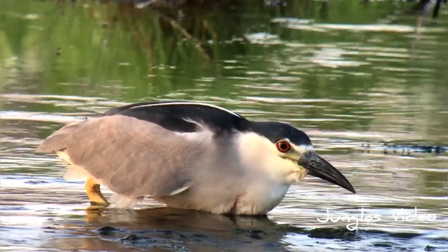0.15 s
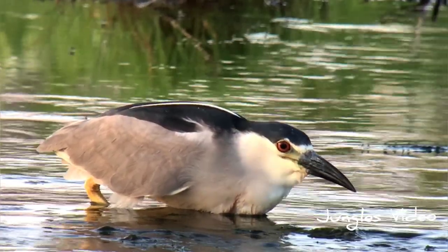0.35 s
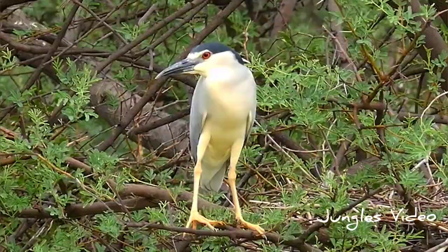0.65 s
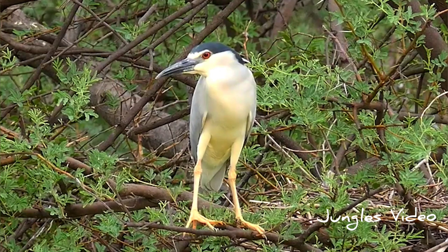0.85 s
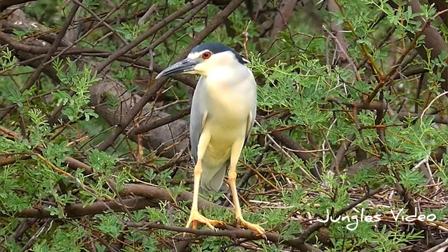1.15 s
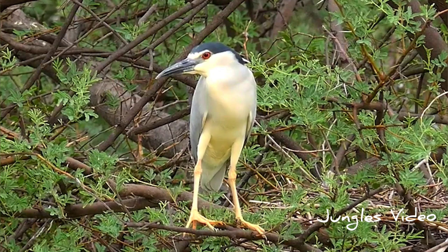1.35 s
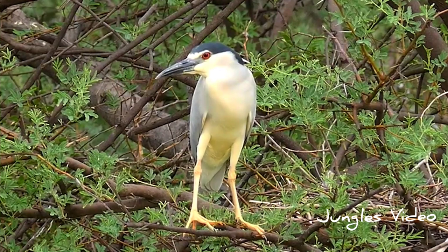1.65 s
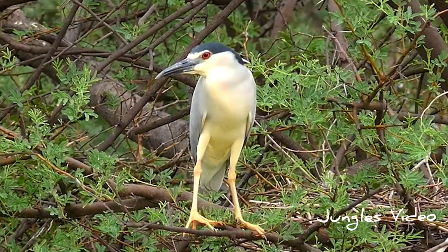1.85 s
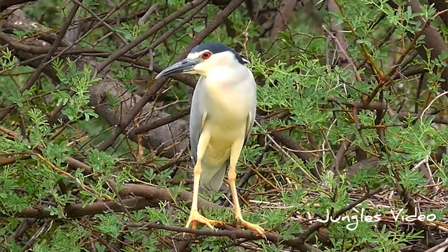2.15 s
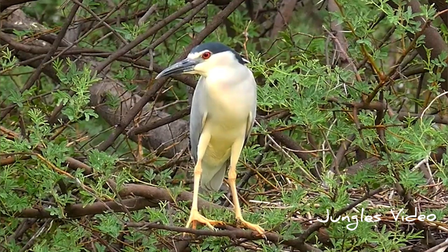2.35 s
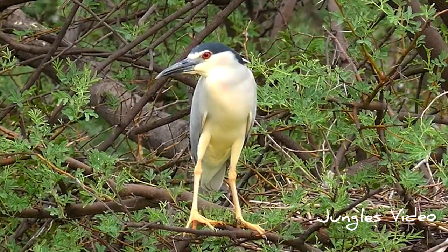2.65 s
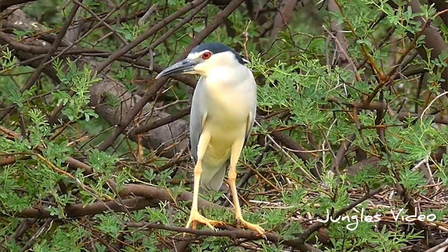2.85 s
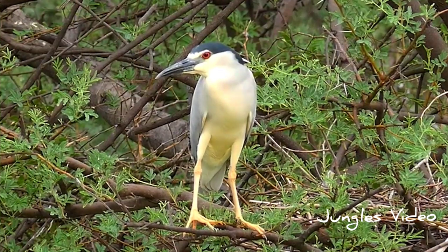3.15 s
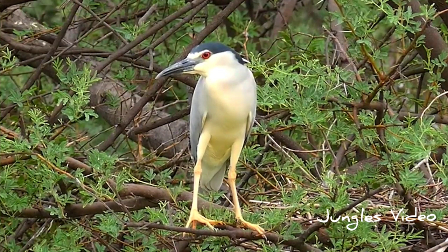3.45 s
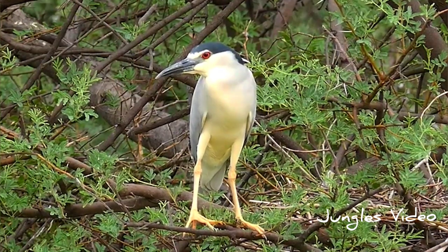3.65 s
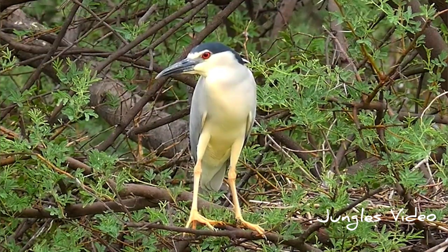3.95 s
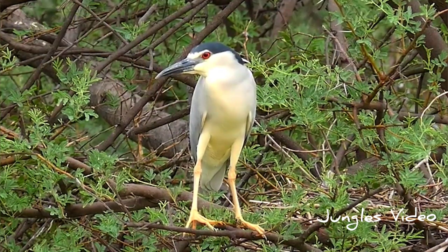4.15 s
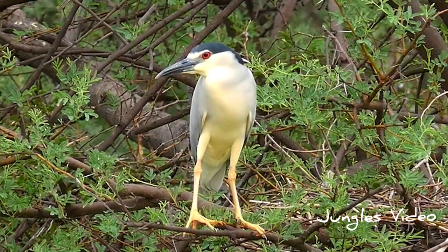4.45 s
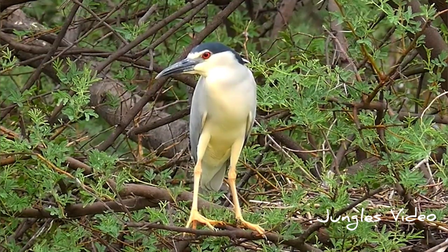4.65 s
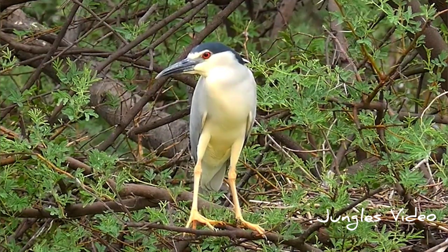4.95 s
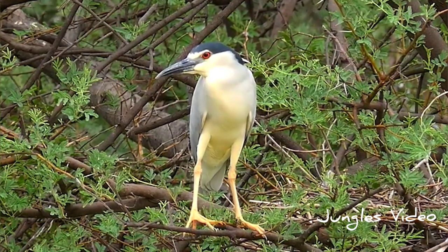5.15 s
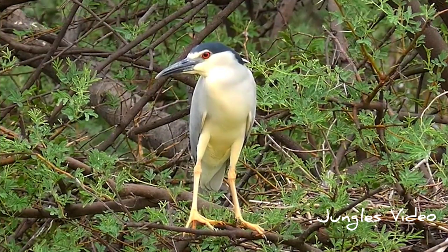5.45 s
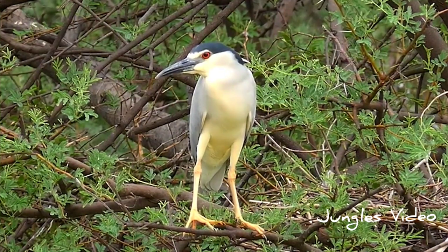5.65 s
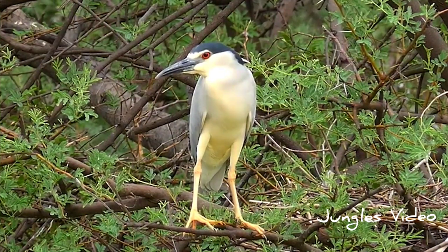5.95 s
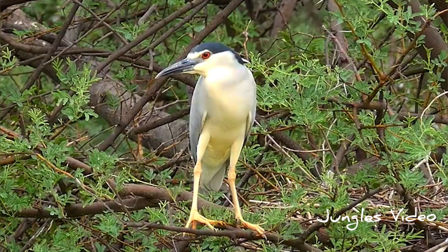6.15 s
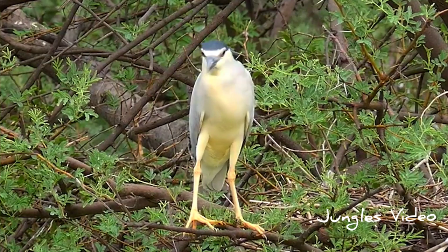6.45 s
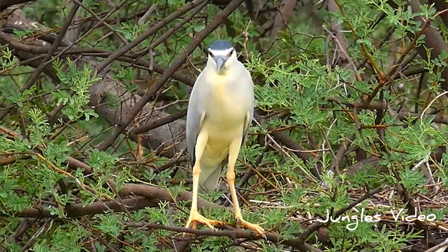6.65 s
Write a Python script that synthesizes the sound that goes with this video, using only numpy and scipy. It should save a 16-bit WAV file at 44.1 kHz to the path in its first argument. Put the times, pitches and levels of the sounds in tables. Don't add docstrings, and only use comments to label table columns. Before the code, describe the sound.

For the first 0.5 seconds there is only barely audible pond noise, then a short silent gap. From about 0.7 to 1.1 seconds a low far-traffic rumble and soft hiss fade in. At 1.1-1.3 a night heron gives one short, harsh, nasal squawk, with an echo from trees and bank. Thin descending whistles follow until 1.7, with rapid chips near 1.6. A distant engine hums upward in pitch until about 4.4, then coasts lower. Faint small-bird chips come near 2.1, 3.0, 3.8 and 4.6; a far heron answers breathily at 2.8 and more faintly at 4.3. Dry ticks and small knocks appear at 3.1-3.6. At 5.1 a second squawk, very brief, brighter and rougher, cracks out and echoes. A sharp tick follows at 5.4, a last chip at 6.2, and small ticks around 6.5 over continuing rumble.

```python
import sys
import numpy as np
from scipy import signal
from scipy.fft import rfft, irfft, next_fast_len
from scipy.io import wavfile
from scipy.ndimage import uniform_filter1d

SR = 44100
rng = np.random.default_rng(int(sys.argv[2]) if len(sys.argv) > 2 else 0)


def store_wav(level_fs):
    pcm = np.round(np.clip(np.atleast_2d(level_fs), -1, 1) * 32767)
    wavfile.write(sys.argv[1], SR, pcm.T.astype(np.int16))


def how_loud(loudness_db):
    steps = np.asarray(loudness_db, float) / 20
    return 10 ** steps


N = 300035

POND_DB, RUMBLE_DB, HISS_DB = -65.5, -43, -54.5
CUT_S, FADE_FROM_S, FADE_TO_S = 0.501, 0.66, 1.07
SETTLE_DB, SETTLE_S = -0.5, 0.46
LIFT_S, LIFT_LOSS_DB = 4.25, 6.5
STRAIN_HZ, STRAIN_RANGE_HZ = 418.8, 30
WHISTLE_SWELL_DB = 4
CHAT_FROM_HZ = 6200
LEAD_S, LEAD_LENGTH_S, LEAD_TO_HZ, LEAD_DB = 0.019, 0.012, 4820, -2.5
FAR_RISE_S, FAR_RISE_HZ, FAR_FADE_DB = 0.1, 110, 9

# freq_hz, level_db_per_hz
POND_SPECTRUM = [(15, -43), (25, -19), (75, 4), (141, -9.5), (534, -21.5), (855, -13.5), (1030, -20.5),
                 (1730, -26.5), (4940, -32.5), (12000, -28.5), (13000, -44)]
# freq_hz, level_db_per_hz
RUMBLE_SPECTRUM = [(15, -39), (25, -44), (47, -5), (70, -1), (109, -8), (237, -17), (315, -20.5),
                   (502, -33), (900, -40), (1170, -111), (1980, -120)]
# freq_hz, level_db_per_hz
HISS_SPECTRUM = [(350, -3.5), (600, -3.5), (1030, -1.5), (1180, -5), (1380, -2.5), (1530, -3.5),
                 (4680, -7.5), (8630, -10.5), (15500, -4.5)]
# centre_s, spread_s, gain_db
VEHICLE_SWELLS = [
    (1.949, 0.49, 2),
    (2.95, 0.54, 2),
    (4.05, 0.14, 1),
    (5.41, 0.14, 2),
]
# time_s, firing_hz, load_db
ENGINE_RUN = [(1.2, 27.4, 0), (1.8, 34, 1), (2.28, 40.5, -2), (3.14, 51.5, 1), (3.57, 56.97, 0),
              (4.1, 63.3, 0), (4.45, 66, -1), (4.65, 63, -9), (4.9, 62.5, -2), (5.2, 61, 1),
              (5.4, 60.7, -6), (5.6, 59.5, -1), (6.0, 55, -6)]
# best_firing_hz, level_db, loss_db_at_one_octave
ENGINE_ORDERS = [
    (60, -40.5, 80),
    (44, -41, 25),
    (52, -48, 80),
]
# start_s, length_s, pitch_hz, level_db
IDLING_ENGINES = [
    (.8, .85, 85.5, -45),
    (6.25, .5, 82, -46),
]
# time_s, pitch_hz, level_db, beak_opening_0_1, upper_line_push_db
SQUAWK_CURVES = [
    [(1.10, 345, -68, 0, -18), (1.135, 388.3, -43, 0.55, -18), (1.165, 400.6, -26, 0.79, -15),
     (1.18, 433.6, -26, .98, -.5), (1.2, 439, -28, 0.95, -1), (1.215, 411, -22, 0.91, -1),
     (1.238, 406.2, -18.5, 0.86, -8.5), (1.27, 349, -31, 0.66, 5), (1.3, 323, -56, 0.35, 9)],
    [(5.05, 307, -62, .2, -3), (5.075, 330.5, -47.5, 0, -7), (5.088, 339, -38.5, 0.08, -3),
     (5.10, 407, -34, 0.52, -3), (5.12, 416.7, -27.5, 0.75, -8), (5.14, 434, -17, 0.99, -4.5),
     (5.157, 425.2, -18.5, 1.01, 1), (5.176, 360.7, -27, 0.86, 0), (5.2, 322, -52, 0.06, -13)],
]
# freq_hz, width_hz, level_db, shut_lowering_hz, shut_change_db
WINDPIPES = [
    [(883, 130, -24, 40, -8), (1659, 160, 2.5, 770, 6), (3260, 390, -17, 200, -15),
     (3930, 300, -30.5, 50, 27), (5720, 560, -18.5, 200, 10), (6250, 260, -29, 50, 7),
     (6800, 500, -29, 100, -9), (8270, 640, -14, 100, -45), (11300, 1200, -36, 100, -19)],
    [(880, 130, -27.5, 20, -12), (1662, 280, 3, 650, -3), (2730, 520, -23, 100, -20),
     (4400, 660, -14.5, 670, 14), (5980, 500, -3.5, 50, -4), (7100, 370, -14, 50, -5),
     (7850, 260, -3.5, 50, -20), (8430, 490, -16.5, 50, -14), (9900, 340, -32, 50, -16),
     (12900, 1700, -40, 50, -12)],
]
MEMBRANES = [
    (.75, .2, .3, .3),
    (.45, .26, 1.01, .15),
]
# null_s, beats_per_s, depth_0_1
MEMBRANE_BEATS = [
    (1.172, 17, 0.02),
    (5.153, 82, 0.95),
]
# highs_db, neck_hz, neck_db
SIDE_SOUND = [
    (-22.5, 1585, -10.5),
    (-10, 1560, -4),
]
# time_s, length_s, gain_db
MEMBRANE_SLAPS = [
    (1.212, .004, 3),
    (5.139, .003, 5),
    (5.148, .002, 7),
    (5.154, .002, 6.5),
    (5.165, .003, 3),
    (5.172, .003, 3),
]
# freq_hz, pole_width_hz, zero_width_hz
GULLET_BRANCH = (2050, 740, 45)
# freq_hz, t60_s, near_trees_end_s
TREE_DECAY = [(1050, 0.63, 3), (1550, 1.21, 4.5), (2300, 0.63, .4), (3600, .6, .25), (4500, 1.9, 0.26),
              (6200, 1.9, 0.25), (8300, .7, .2), (10700, 0.33, 0.1)]
# delay_s, spread_s, gain_db
TREE_RETURNS = [
    (.09, 0.059, 1.5),
    (.2, 0.03, 3),
    (.35, 0.025, 1.5),
    (0.431, .03, -3),
    (.51, 0.026, 4.5),
]
# start_s, length_s, from_hz, to_hz, final_db
WHISTLE_NOTES = [
    (1.285, .095, 2060, 2010, -52),
    (1.39, .06, 1960, 1950, -56),
    (1.455, .11, 1965, 1900, -55),
    (1.565, .04, 1880, 1850, -56),
    (6.255, .05, 2070, 2095, -62),
    (5.0, .09, 6300, 6100, -67),
]
# start_s, length_s, from_hz, to_hz, level_db
OTHER_CHIPS = [
    (1.61, 0.0122, 6070, 4450, -59),
    (1.636, 0.0117, 6100, 3990, -47),
    (1.66, 0.0058, 5640, 4080, -57),
    (2.11, .08, 4950, 4850, -67.5),
    (3.398, 0.026, 4160, 3000, -67),
    (3.466, 0.032, 4100, 2750, -64),
    (4.389, 0.0286, 4960, 4400, -66),
    (4.436, 0.03, 4700, 4400, -69),
    (4.623, 0.136, 5100, 4967, -74),
]
# start_s, length_s, end_hz, level_db
CHAT_CHIPS = [
    (2.075, 0.025, 4770, -59),
    (2.956, 0.029, 4800, -56),
    (3.805, .033, 4380, -56),
    (4.556, .03, 4350, -56),
    (6.159, .026, 4200, -59),
]
# top_s, fall_s, top_hz, fall_hz, top_db
FAR_CALLS = [
    (2.76, .14, 1075, 200, -59),
    (4.33, .13, 1000, 320, -65),
]
# start_s, peak_db, pitch_hz, t60_s
TICK_RINGS = [
    (3.102, -41.5, 5460, 0.0022),
    (3.41, -56, 3150, 0.011),
    (3.45, -51, 1800, 0.004),
    (3.475, -53, 2720, 0.013),
    (3.485, -53, 3600, .012),
    (3.55, -50, 1520, 0.0051),
    (5.397, -35, 6140, 0.0018),
    (6.499, -53, 3250, 0.011),
    (6.6, -43, 1620, 0.0034),
]


def rms_one(x):
    return x / np.sqrt(np.mean(x ** 2) + 1e-20)


def span(rows):
    time_s, *columns = np.transpose(rows)
    at = np.arange(round(time_s[0] * SR), min(round(time_s[-1] * SR), N))
    return at, [np.interp(at / SR, time_s, column) for column in columns]


def at_hz(points, hz):
    points = np.array(points)
    return np.interp(np.log(hz + 1), np.log(points[:, 0]), points[:, 1])


def wander(size, rate_hz):
    r = np.exp(-2 * np.pi * rate_hz / SR)
    settle = 9000
    drift = signal.lfilter([1], [1, -2 * r, r * r], rng.standard_normal(size + settle))
    return rms_one(drift[settle:])


def coloured(spectrum):
    size = next_fast_len(N)
    hz = np.arange(size // 2 + 1) * SR / size
    bins = rfft(rng.standard_normal(size)) * how_loud(at_hz(spectrum, hz))
    return rms_one(irfft(bins, size)[:N])


def tone(at, hz, level_db, edge_s):
    out = np.zeros(N)
    to_end_s = np.minimum(at - at[0], at[-1] - at) / SR
    edges = np.clip(to_end_s / edge_s, 0, 1)
    out[at] = np.sqrt(2) * how_loud(level_db) * edges * np.sin(np.cumsum(2 * np.pi * hz / SR))
    return out


def bumps_db(t, rows):
    return sum(db * np.exp(-((t - centre_s) / spread_s) ** 2) for centre_s, spread_s, db in rows)


def pond():
    t = np.arange(N) / SR
    return how_loud(POND_DB) * coloured(POND_SPECTRUM) * np.clip((CUT_S - t) / 0.004, 0, 1)


def traffic_rumble():
    level_db = RUMBLE_DB + bumps_db(np.arange(N) / SR, VEHICLE_SWELLS) + 1.0 * wander(N, 18.5)
    return how_loud(level_db) * coloured(RUMBLE_SPECTRUM)


def recorder_hiss():
    after_s = np.clip(np.arange(N) / SR - FADE_TO_S, 0, None)
    level_db = HISS_DB + SETTLE_DB * np.exp(-after_s / SETTLE_S) + 0.38 * wander(N, 20.0)
    return how_loud(level_db) * coloured(HISS_SPECTRUM)


def engines():
    at, (firing_hz, load_db) = span(ENGINE_RUN)
    coasting = np.clip((at / SR - LIFT_S) / 0.2, 0, 1)
    out = 0
    for k, (best_hz, db, loss_db) in enumerate(ENGINE_ORDERS):
        level_db = db + load_db - loss_db * np.log2(firing_hz / best_hz) ** 2
        level_db = level_db - LIFT_LOSS_DB * k * coasting + 1.2 * wander(len(at), 1.5)
        out = out + tone(at, (k + 1) * firing_hz, level_db, edge_s=0.3)
    for start_s, length_s, idle_hz, db in IDLING_ENGINES:
        at, (hz,) = span([(start_s, idle_hz), (start_s + length_s, idle_hz)])
        hz = hz * (1 + 0.02 * wander(len(at), 2.5))
        level_db = db + 2.0 * wander(len(at), 3.0)
        out = out + tone(at, hz, level_db, edge_s=0.14)
        out = out + tone(at, 1.5 * hz, level_db - 9, edge_s=0.176)
    return out


def windpipe_gain(hz, throat, shut):
    gain = 0
    for top_hz, width_hz, db, lower_hz, shut_db in throat:
        off = 2 * (hz - top_hz + lower_hz * shut) / width_hz
        gain = gain + how_loud(db + shut_db * shut) / (1 + off ** 2) ** 1.03
    return gain


def gullet(x):
    hz, pole_hz, zero_hz = GULLET_BRANCH
    radii = np.exp(-np.pi * np.array([zero_hz, pole_hz]) / SR)
    b, a = ([1, -2 * r * np.cos(2 * np.pi * hz / SR), r * r] for r in radii)
    return signal.lfilter(b, a, x + 1e-18)


def squawk(rows, throat, voice, beat, sideways):
    at, (pitch_hz, level_db, beak, bright_db) = span(rows)
    rough_shut, rough_open, odd_shut, odd_open = voice
    null_s, beats_per_s, depth = beat
    sideways_db, neck_hz, neck_db = sideways
    shut = 1 - beak
    rough = rough_shut + (rough_open - rough_shut) * beak
    strain = np.clip((pitch_hz - STRAIN_HZ) / STRAIN_RANGE_HZ, 0, 1)
    odd = np.clip(odd_shut + (odd_open - odd_shut) * beak + strain, 0, 1)
    pitch_hz = pitch_hz * (1 + 0.025 * rough * wander(len(at), 90.0))
    phase = np.cumsum(2 * np.pi * pitch_hz / SR)
    beating = 1 - depth + depth * np.sqrt(2) * np.sin(np.pi * beats_per_s * (at / SR - null_s))
    bright = how_loud(bright_db + bumps_db(at / SR, MEMBRANE_SLAPS))
    side_bright = how_loud(bright_db + sideways_db)
    front, side = 0, 0
    for k in np.arange(3, 68) / 2:
        hz = k * pitch_hz
        pipe = windpipe_gain(hz, throat, shut)
        turn = phase * k + rng.uniform(0, 2 * np.pi)
        share = 0 if k % 1 else odd if k % 2 else 1
        line = np.sin(turn) * share
        ragged = wander(len(at), 230.0) * np.sin(turn) + wander(len(at), 165.0) * np.cos(turn)
        breath = rough * (0.1 + 0.06 * k) * ragged
        if k > 5:
            front = front + pipe * bright * (0.72 * line + breath)
            low_cut = 1 + (4100 / hz) ** 8
            high_cut = (1 + (hz / 8900) ** 12) * (1 + (hz / 7000) ** 3)
            side = side + pipe ** 0.35 * side_bright * ragged / low_cut / high_cut
        else:
            front = front + pipe * (beating * line + breath)
            neck = how_loud(neck_db) * ragged / (1 + (2 * (hz - neck_hz) / 400) ** 4)
            side = side + 0.6 * pipe * beating * line + neck
    loudness = np.sqrt(uniform_filter1d(front ** 2, 1100))
    out = np.zeros((2, N))
    out[:, at] = how_loud(level_db) * np.array([front, side]) / loudness
    return gullet(out)


def woods(x):
    t = np.arange(SR) / SR
    edges_hz = 400 * 2 ** (np.arange(16) / 3)
    decay = np.array(TREE_DECAY)
    echo = 0
    for low_hz, high_hz in zip(edges_hz, edges_hz[1:]):
        sos = signal.butter(2, [low_hz, high_hz], "band", fs=SR, output="sos")
        band = signal.sosfilt(sos, rng.standard_normal(SR))
        centre_hz = np.sqrt(low_hz * high_hz)
        t60_s = at_hz(decay[:, [0, 1]], centre_hz)
        end_s = at_hz(decay[:, [0, 2]], centre_hz)
        echo = echo + band * how_loud(-60 * t / t60_s - 6 * (t / end_s) ** 4)
    echo = echo * how_loud(bumps_db(t, TREE_RETURNS)) * np.clip(t / 0.006, 0, 1) / np.sqrt(SR)
    return signal.fftconvolve(x, echo)[:N]


def whistles():
    out = 0
    for start_s, length_s, from_hz, to_hz, db in WHISTLE_NOTES:
        at, (hz, level_db) = span([(start_s, from_hz, db - WHISTLE_SWELL_DB), (start_s + length_s, to_hz, db)])
        out = out + tone(at, hz, level_db + 3.5 * wander(len(at), 30.0), edge_s=0.012)
    return out


def bush(x, t60_s):
    t = np.arange(SR // 4) / SR
    hits = rng.random(len(t)) < 0.007
    leaves = rng.standard_normal(len(t)) * hits * how_loud(-60 * t / t60_s)
    return signal.fftconvolve(x, leaves / np.sqrt(np.sum(leaves ** 2)))[:N]


def chips():
    strokes = list(OTHER_CHIPS)
    for start_s, length_s, to_hz, db in CHAT_CHIPS:
        strokes.append((start_s, length_s, CHAT_FROM_HZ, to_hz, db))
        strokes.append((start_s - LEAD_S, LEAD_LENGTH_S, CHAT_FROM_HZ, LEAD_TO_HZ, db + LEAD_DB))
    out = 0
    for start_s, length_s, from_hz, to_hz, db in strokes:
        at, (hz,) = span([(start_s, from_hz), (start_s + length_s, to_hz)])
        out = out + tone(at, hz * (1 + 0.065 * wander(len(at), 400.0)), db, edge_s=0.003)
    return out + how_loud(2) * bush(out, t60_s=0.2)


def far_heron():
    out = 0
    for top_s, fall_s, top_hz, fall_hz, top_db in FAR_CALLS:
        at, (away,) = span([(top_s - FAR_RISE_S, -1), (top_s, 0), (top_s + fall_s, 1)])
        hz = top_hz - np.where(away < 0, FAR_RISE_HZ, fall_hz) * abs(away) ** 2.49
        db = top_db - FAR_FADE_DB * away ** 2
        line_hz = hz * (1 + 0.017 * wander(len(at), 40.0))
        out = out + tone(at, line_hz, db + 2.0 * wander(len(at), 50.0), edge_s=0.011)
        breath_hz = hz * (1 + 0.12 * wander(len(at), 150.0))
        out = out + tone(at, breath_hz, db - 2.5, edge_s=0.015)
    return out


def ticks():
    size = 2000
    out, t = np.zeros(N + size), np.arange(size) / SR
    for start_s, db, hz, t60_s in TICK_RINGS:
        ring = how_loud(db - 60 * t / t60_s) * (1 - np.exp(-8.0 * t / t60_s)) * np.sin(2 * np.pi * hz * t)
        first = round(start_s * SR)
        out[first:first + size] += 4 * ring
    return out[:N]


def scene():
    t = np.arange(N) / SR
    fade = np.clip((t - FADE_FROM_S) / (FADE_TO_S - FADE_FROM_S), 0, 1)
    background = fade * (traffic_rumble() + recorder_hiss() + engines())
    calls = zip(SQUAWK_CURVES, WINDPIPES, MEMBRANES, MEMBRANE_BEATS, SIDE_SOUND)
    (front_1, side_1), (front_2, side_2) = [squawk(*call) for call in calls]
    far = whistles() + chips() + far_heron()
    ticking = ticks()
    echoes = woods(how_loud(-1) * side_1 + how_loud(-3.0) * side_2 + how_loud(-1) * far + how_loud(4) * ticking)
    return (pond() + background + front_1 + front_2 + far + ticking + echoes)[None]


def band_limit(x):
    return signal.sosfilt(signal.butter(12, 15670, fs=SR, output="sos"), x)


def record(dry):
    bins = rfft(dry)
    bins[:, round(15520 * N / SR):] = 0
    mix = irfft(bins, N)
    return band_limit(mix)


dry = scene()
out = record(dry)
store_wav(out)
```